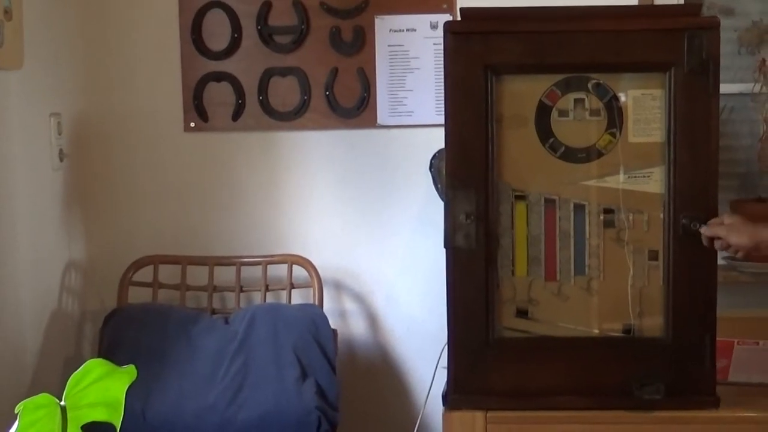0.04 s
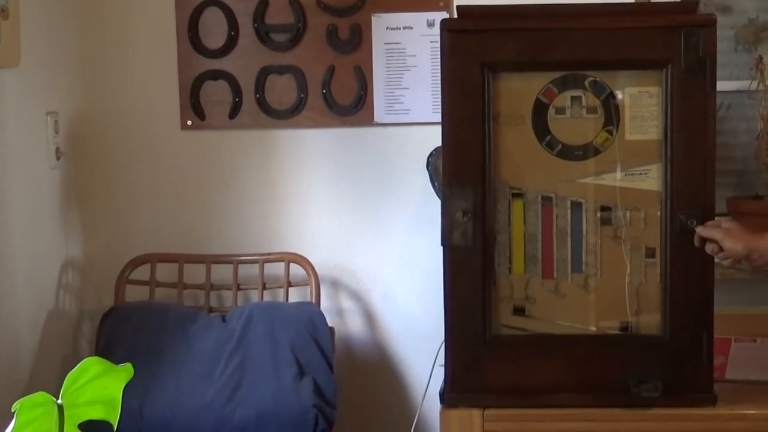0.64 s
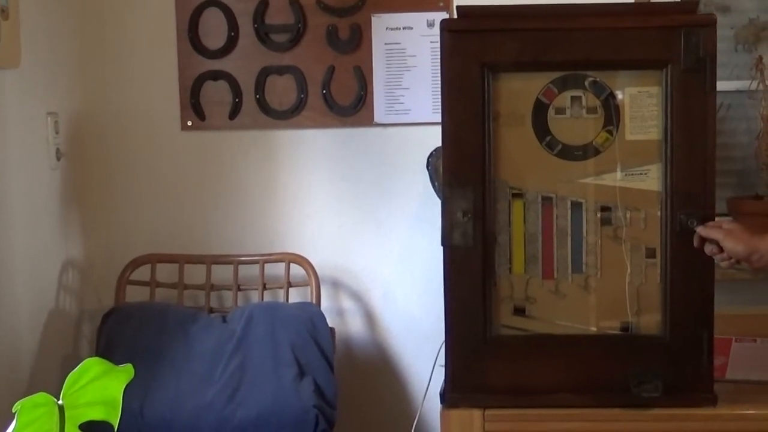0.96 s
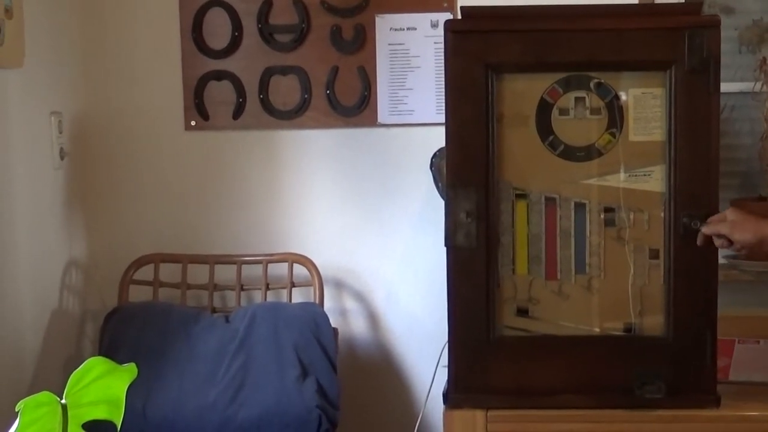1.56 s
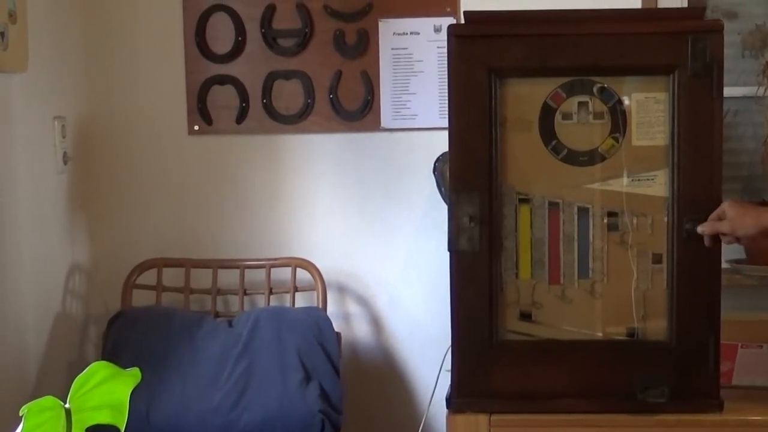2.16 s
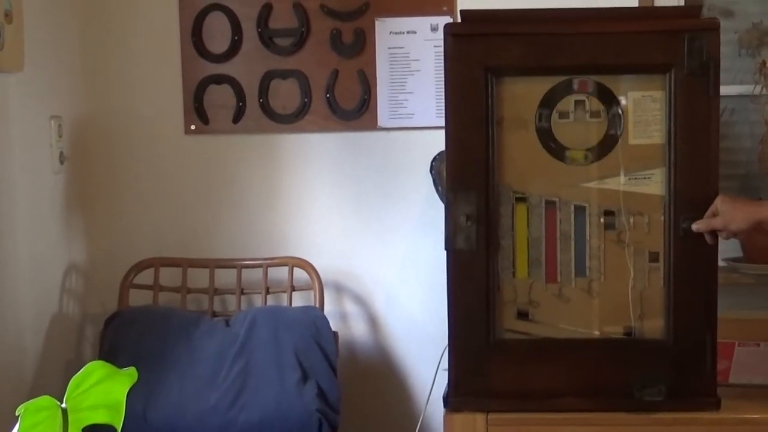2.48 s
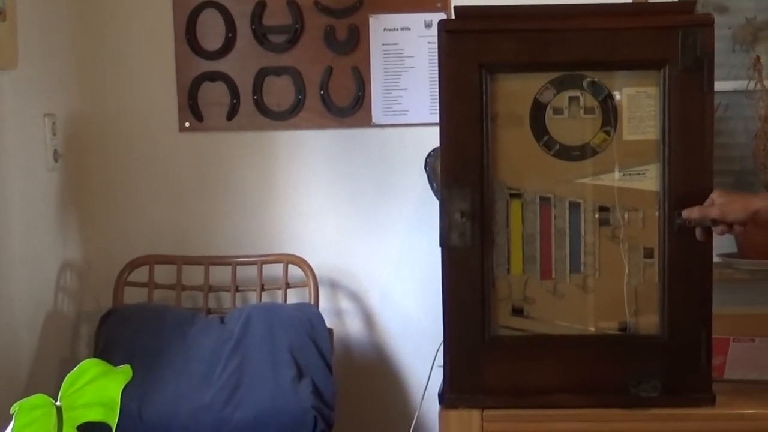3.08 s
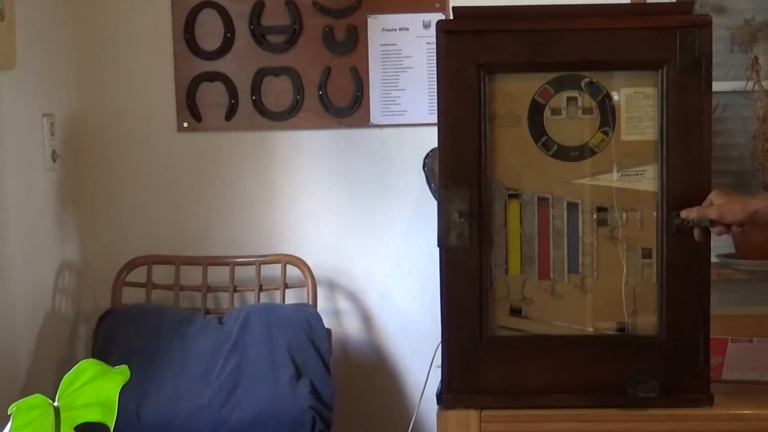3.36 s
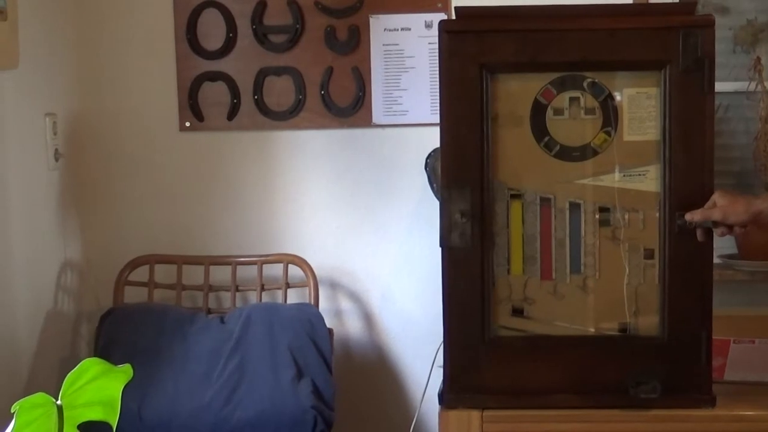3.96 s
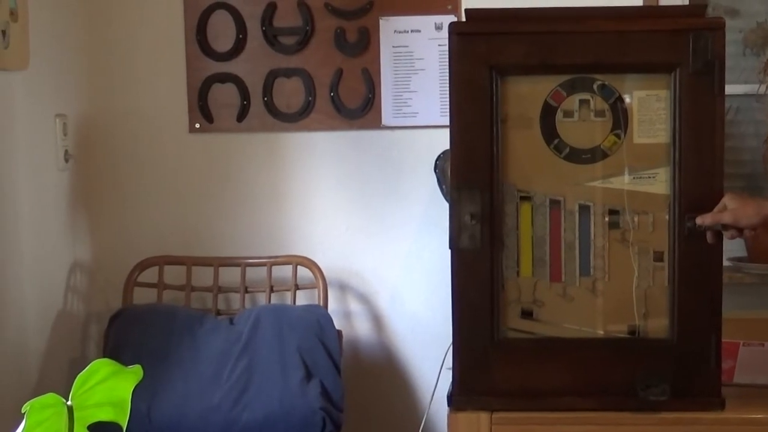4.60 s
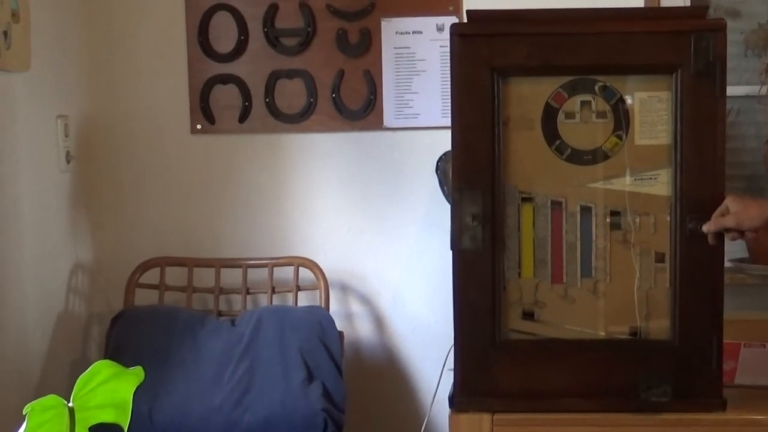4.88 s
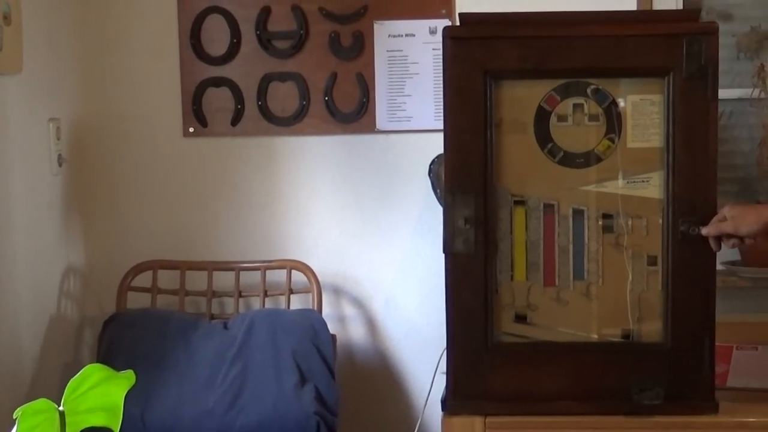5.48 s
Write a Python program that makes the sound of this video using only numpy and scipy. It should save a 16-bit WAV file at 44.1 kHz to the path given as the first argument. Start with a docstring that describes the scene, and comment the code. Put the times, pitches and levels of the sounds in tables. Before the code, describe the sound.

An old mechanical coin machine in a wooden cabinet is worked by hand. A faint ratchet whirs down and stops with a hollow knock. Soft rubbing and handle clicks build into sharp lever clicks and a heavy clunk. Coins release with a clank, clatter down a chute and bounce ringing in a metal cup, followed by faint ticks. The small room adds a short reverberation.

```python
"""The steel works of an old coin machine, worked by hand in a wooden wall cabinet in a small, live room.
Each impact excites the modes of a part and shakes the case: levers click, and the works trip with a clunk.
A ratchet wheel runs down, rods rub in their guides and a spring hums. Coins then clatter down a chute,
and two bounce ringing in the cup. A limiter holds down the loudest blows."""
import sys
import numpy as np
from scipy import signal
from scipy.fft import rfft, irfft, next_fast_len
from scipy.io import wavfile
from scipy.ndimage import uniform_filter1d, minimum_filter1d

SR = 44100
rng = np.random.default_rng(int(sys.argv[2]) if len(sys.argv) > 2 else 0)


def log_audio(samples):
    """Write samples as a 16-bit WAV file to the path given in sys.argv[1]."""
    # one column per channel
    frames = np.atleast_2d(samples).T
    # limit to full scale, then quantise
    limited = np.clip(frames, -1, 1)
    pcm = np.round(limited * 32767).astype(np.int16)
    wavfile.write(sys.argv[1], SR, pcm)


N = 248724
BLOW_SAMPLES = 2 ** 15
BLOW_TIME, SCENE_TIME = np.arange(BLOW_SAMPLES) / SR, np.arange(N) / SR  # seconds

# Spectrum of the wood's thump. Each row: frequency in Hz, relative density in dB.
WOOD_THUMP = [(25, -33), (60, -12.5), (100, -35), (135, 0), (200, -11), (300, -4), (450, -9.5), (900, -39)]
# Stereo width of the room. Each row: frequency in Hz, side relative to mid in dB.
STEREO_WIDTH = [(60, -20), (140, -15), (280, -6), (600, -8), (2000, -9), (5000, -8), (9000, -12),
                (12000, -22)]


def works():
    """Impact excitation: steel parts share one set of modes, and each kind of contact has its own pulse."""
    # Resonances of the steel. Each row: frequency in Hz, bandwidth in Hz, relative gain in dB.
    modes = [(2900, 150, -33), (4000, 220, -22), (5030, 250, -0.5), (5480, 230, -6.5), (6210, 63, 3),
             (7480, 35, -14), (8500, 35, 18), (7970, 320, -17), (10030, 23, 2), (10700, 62, -36),
             (12460, 64, 1), (12800, 61, -29)]
    # Contacts. Each row: start in seconds, then relative steel level, case level and sheen in dB.
    handle_stops = [(1.311, -22, -32.5, -7), (1.330, -52, -45, -6), (1.736, -39, -43, 0),
                    (2.2612, -12, -23.5, -5), (2.2762, -15.5, -25.5, -5)]
    lever_clicks = [(0.6318, -24, -38.5, 9), (2.5163, -13, -29.5, -3), (2.5974, -15.5, -45, 0),
                    (2.6758, -11, -33, 8.5), (2.7208, -18, -34.5, -22), (2.816, -11, -31, 3),
                    (2.8967, -12, -34, 0), (3.190, -14.5, -48, 14.5), (3.752, -12.5, -29, 2),
                    (3.8162, -9, -28, 7), (3.8395, -9, -27, -1), (3.9566, -8.5, -28.5, 1),
                    (4.064, -12, -40, -5), (4.0882, -13, -31, 4), (4.150, -16.5, -40, -22)]
    trip_slams = [(3.0051, -4.5, -14, 3), (3.022, -7, -14, -20), (3.0688, -7.5, -11.5, 4),
                  (3.0968, -14.5, -16.5, -3)]  # the works trip and slam home
    brushing_parts = [(0.778, -47, -39.5, -4), (0.8346, -38, -38.5, 11), (1.262, -42.5, -46, -7),
                      (2.238, -45, -35.5, -3), (2.414, -28, -28.5, -9), (2.8785, -19, -23, 6),
                      (2.9497, -19, -35, 0), (3.219, -21.5, -34, 14), (3.271, -19.5, -36, 5),
                      (3.3492, -22.5, -35.5, 4), (3.985, -28, -37, -8), (4.115, -22, -35.5, -2)]
    pawl_ticks = [(1.548, -47, -45.5, 6), (4.9109, -53, -56, 0), (5.012, -51, -79, 9),
                  (5.0396, -44.5, -72, 15), (5.146, -36, -70, 9), (5.154, -37.5, -72, 5),
                  (5.5648, -51, -74, 15)]  # a light pawl, as the works come to rest
    handle = contacts(handle_stops, modes, WOOD_THUMP, attack=0.0021, t60=0.038, steel_db=-5,
                      ring_db=-13.5, knock_db=7.5, thump_db=-15, bright_hz=9000, bright_db=2.5,
                      wet_db=-4)
    levers = contacts(lever_clicks, modes, WOOD_THUMP, attack=0.0026, t60=0.042, steel_db=-2,
                      ring_db=-15, knock_db=6.5, thump_db=-6, bright_hz=9100, bright_db=2.5, wet_db=1)
    slams = contacts(trip_slams, modes, WOOD_THUMP, attack=0.0043, t60=0.061, steel_db=-2.5,
                     ring_db=-16, knock_db=5, thump_db=3, bright_hz=9200, bright_db=4, wet_db=1)
    scuffs = contacts(brushing_parts, modes, WOOD_THUMP, attack=0.011, t60=0.058, steel_db=1,
                      ring_db=-2, knock_db=7, thump_db=-2, bright_hz=8900, bright_db=-0.5, wet_db=1.5)
    ticks = contacts(pawl_ticks, modes, WOOD_THUMP, attack=0.00099, t60=0.097, steel_db=1.5,
                     ring_db=-25, knock_db=7.5, thump_db=-15, bright_hz=9140, bright_db=9, wet_db=3.5)
    return handle + levers + slams + scuffs + ticks


def cabinet():
    """Free vibration: heavy stops set the low modes of the wooden cabinet ringing."""
    # Each row: start in seconds, level in dB.
    clunks = [(1.328, -32), (3.008, -39), (3.104, -14), (3.126, -16.5), (3.190, -31), (3.850, -29.5)]
    # Each row: frequency in Hz, relative level in dB, t60 in seconds before extra damping.
    modes = [(120, -9, .4), (140, 0, .42), (168, -8, .3), (238, -7, .28), (304, -5, .3), (361, -8, .3),
             (418, -12, .25), (735, -16, .25)]
    return strikes(clunks, modes, scatter_db=3.5, damping=2.2, attack=0.0041, wet_db=-2.5)


def coin_column():
    """Impact excitation: coins tipping out of their column drive its resonances."""
    # Each row: start in seconds, then relative steel level, case level and sheen in dB.
    release = [(3.439, -18.5, -20.5, 8), (3.462, -16, -21, -5), (3.477, -10.5, -25.5, 5.5),
               (3.5112, -5.5, -16.5, 7), (3.5291, -6.5, -48, 3), (3.5525, -16.5, -24.5, -2),
               (3.6204, -24, -36, 10)]
    # Each row: frequency in Hz, bandwidth in Hz, relative gain in dB.
    modes = [(1740, 72, 4), (2500, 43, 4), (3240, 73, 5.5), (4870, 220, 3), (6150, 140, -7),
             (7150, 150, 11), (7900, 44, 8), (7500, 35, -6), (9100, 37, -18), (9130, 26, -16),
             (9640, 43, 2), (10400, 100, -10.5)]
    return contacts(release, modes, WOOD_THUMP, attack=0.0012, t60=0.065, steel_db=-2,
                    ring_db=-8.5, knock_db=-1, thump_db=-73, bright_hz=9130, bright_db=5.5, wet_db=3)


def payout_slide():
    """Heavy damping: the modes of the slide under the column die so fast that it clanks."""
    # Each row: start in seconds, level in dB.
    hits = [(3.464, -10), (3.478, -11), (3.492, -17)]
    # Each row: frequency in Hz, relative level in dB, t60 in seconds before extra damping.
    modes = [(1357, -4, 0.089), (1594, -3, 0.088), (1716, -5, 0.13), (2040, -2, 0.11), (2441, -5, 0.16)]
    return strikes(hits, modes, scatter_db=1, damping=4.4, attack=0.0035, wet_db=-1)


def chute():
    """Plate vibration: tumbling coins ring the chute's sheet wall; single ones knock its mouth and the cup."""
    # Runs of coins. Each row: start and length in seconds, then steel level, case level and loss in dB.
    runs = [(4.226, 0.108, -9.5, -21.5, 5), (4.3994, 0.09, -9, -12.5, 14)]
    # Each row: start in seconds, then relative steel level, case level and sheen in dB.
    knocks = [(4.208, -14, -19.5, -1), (4.5288, -12, -21.5, -8), (4.5945, -24, -26.5, 6),
              (4.6865, -32, -33.5, 1)]
    # Each row: frequency in Hz, bandwidth in Hz, relative gain in dB.
    chute_modes = [(750, 59, 3.5), (1156, 25, 4), (1800, 150, 5.5), (2340, 140, 3), (2815, 48, 2),
                   (3310, 70, -1.5), (4540, 210, -2), (5570, 130, -19), (6050, 140, -0.5), (7200, 45, -13),
                   (8160, 82, 3), (7650, 290, -15), (9000, 240, 1.5), (10200, 120, -12)]
    # Each row: frequency in Hz, relative level in dB, t60 in seconds before extra damping.
    wall_modes = [(2111, -7, .25), (2265, -4, .25), (2920, -7, .2), (3073, -7, .25), (3273, 0, .28)]
    # Each row: frequency in Hz, relative density in dB.
    tray_thump = [(40, -42), (120, -17), (190, -17), (235, -7), (290, 0), (420, -10), (520, -7), (620, -13),
                  (760, -22), (1100, 0), (2000, -41)]
    touches = np.vstack([tumble(*run, count=6) for run in runs])
    clatter = contacts(np.vstack([touches, knocks]), chute_modes, tray_thump, attack=0.00069, t60=0.06,
                       steel_db=-1.5, ring_db=-6, knock_db=-4.5, thump_db=-12.5, bright_hz=8600,
                       bright_db=2, wet_db=1.5)
    wall_hits = touches[:, :2] + [0, -12]  # 12 dB below each touch
    wall = strikes(wall_hits, wall_modes, scatter_db=1.5, damping=1.9, attack=0.00041, wet_db=-2)
    return radiate(clatter, edge_hz=99) + wall


def tumble(start, length, steel_db, case_db, loss_db, count, jitter=0.2, scatter_db=1):
    """Dissipation: the unevenly spaced contacts of a run of coins weaken as it goes on."""
    k = np.arange(count)
    progress = (k + (k > 0) * jitter * rng.standard_normal(count)) / count
    force_db = scatter_db * rng.standard_normal(count) - loss_db * progress
    return np.c_[start + length * progress, steel_db + force_db, case_db + force_db, np.zeros(count)]


def tray():
    """Plate vibration: dropping coins ring the tray, which radiates its lowest modes weakly."""
    # Each row: start in seconds, relative level in dB.
    hits = [(4.412, -22), (4.445, -21.5), (4.54, -29.5), (4.597, -44)]
    # Each row: frequency in Hz, relative level in dB, t60 in seconds before extra damping.
    modes = [(237, 1, .35), (490, -5, .2), (525, -5, .2), (745, -1, .2), (1140, -6, .4)]
    ringing = strikes(hits, modes, scatter_db=3, damping=1.35, attack=0.0026, wet_db=-1)
    return radiate(ringing, edge_hz=356)


def coins(restitution=0.74, bounce_loss_db=9, count=6, wet_db=2):
    """Inelastic collision: two coins bounce ever faster and softer in the cup, ringing and skittering."""
    # Each row: start in seconds, level in dB, first flight in seconds.
    landings = [(4.504, -8, 0.036), (4.528, -12, 0.028)]
    # One set per coin. Each row: frequency in Hz, relative level in dB, t60 in seconds before damping.
    coin_modes = [
        [(7650, -11, .4), (10017, -3, .25), (10588, -1, .28), (10655, -6, .3), (11815, -14, .26),
         (15052, -20, .4)],
        [(8140, -11, .25), (8900, -8, .2), (9215, 0, .26), (9272, -2, .26), (9352, -4, .22), (9880, -4, .18),
         (10436, -4, .18), (12663, -13, .25)],
    ]
    # The skittering rim. Each row: frequency in Hz, bandwidth in Hz, relative gain in dB.
    rim_modes = [(8050, 390, -5.5), (9500, 460, -10), (10040, 550, -8), (11900, 250, -3)]
    track = np.zeros((2, N))
    k = np.arange(count)
    for (start, first_db, first_flight), modes in zip(landings, coin_modes):
        flights = first_flight * restitution ** k
        bounces = np.c_[start + np.cumsum(flights) - flights, first_db - bounce_loss_db * k]
        track += strikes(bounces, modes, scatter_db=1, damping=1.37, attack=0.00026, wet_db=wet_db)
        for s, db in bounces:
            touch = rng.standard_normal(BLOW_SAMPLES) * fade(t60=0.016, attack=0.00044)
            add(track, s, in_room(amp(db + 5.5) * resonate(touch, rim_modes), wet_db))
    return track


def catch():
    """Free vibration: a small catch, flicked, pings in two high modes."""
    # Each row: start in seconds, level in dB.
    flicks = [(1.553, -41.5), (2.598, -19.5), (3.322, -34), (3.441, -19)]
    # Each row: frequency in Hz, relative level in dB, t60 in seconds before extra damping.
    modes = [(5820, -0.44, 0.079), (6080, -1.5, 0.056)]
    return strikes(flicks, modes, scatter_db=0, damping=1.7, attack=0.0012, wet_db=-1)


def latch():
    """Damped resonance: the latch knocks hollowly as the wheel stops."""
    # Each row: start in seconds, level in dB.
    knocks = [(0.640, -47), (0.664, -26.5), (0.705, -51)]
    # Each row: frequency in Hz, relative level in dB, t60 in seconds before extra damping.
    modes = [(270, -18, 0.11), (706, 7, 0.17), (743, 4, 0.11), (787, -20, 0.16), (1190, -8, .1)]
    return strikes(knocks, modes, scatter_db=10, damping=2.3, attack=0.00065, wet_db=-1)


def ratchet(teeth_per_s=64, coast_s=0.85, caught_s=0.77, stop_db_per_s=293, waver_rad=0.32):
    """Repeated excitation: each tooth scrapes and rings a pawl; the slowing wheel sings until caught."""
    # Spectrum of the scrape. Each row: frequency in Hz, relative density in dB.
    whirr_spectrum = [(71, -37), (120, -12.5), (321, -1.5), (557, -13.5), (727, -7), (988, -11),
                      (1790, -11), (3660, -10.5), (3900, -23), (4320, -13), (5750, 4.5), (6240, -4),
                      (8840, -2.5), (14700, -17.5), (16000, -21)]
    # Each row: frequency in Hz, bandwidth in Hz, relative gain in dB.
    pawl_modes = [(4006, 36, -2), (4670, 110, 0.5), (6300, 20, -15), (6620, 170, 4.5), (8090, 23, 5),
                  (8200, 40, -9.5), (8630, 220, -8), (9100, 130, 0.5), (12500, 150, -26)]
    # Each row: frequency in Hz, relative level in dB.
    wheel_tones = [(4016, -63.5), (4576, -59), (5410, -70), (5841, -64), (6611, -63), (8070, -57),
                   (8629, -58), (8829, -52)]
    pace = teeth_per_s * np.exp(-SCENE_TIME / coast_s)
    teeth_passed = np.cumsum(pace) / SR
    since_tooth = (teeth_passed % 1) / pace
    tooth_force = amp(0.29 * rng.standard_normal(1000))[teeth_passed.astype(int)]
    turning = amp(-stop_db_per_s * np.maximum(SCENE_TIME - caught_s, 0))
    pressure = turning * tooth_force * (np.exp(-since_tooth / 0.0067) + 0.39)
    scrape = unit(pressure) * np.sqrt(np.mean(turning ** 2)) * rng.standard_normal(N)
    whirr = unit(filtered(scrape, lambda hz: amp(along(whirr_spectrum, hz)))) * scrape.std()
    ticking = amp(-2) * whirr + amp(-3.5) * resonate(scrape, pawl_modes)
    tones = sum(amp(db) * np.sin(2 * np.pi * hz * SCENE_TIME + waver_rad * noise(lambda f: -f, N))
                for hz, db in wheel_tones)
    return amp(-39) * (in_room(ticking, wet_db=-2.5) + amp(-10.5) * turning * unit(tones))


def rods(slips_per_s=350, grip_db_per_s=334):
    """Stick-slip friction: rods rub through their guides in tiny slips that sound through the wood."""
    # Each row: time of the peak in seconds, relative level in dB, t60 in seconds.
    strokes = [(0.69, -37, 0.083), (0.785, -43, 0.7), (1.278, -50, 0.067), (1.345, -37.5, 0.35),
               (1.56, -54, 0.19), (1.605, -54, 0.15), (1.698, -50.5, 0.058), (1.765, -45.5, 0.54),
               (2.277, -38.5, 0.58), (2.43, -43.5, 0.42), (2.56, -65, 0.68), (5.245, -52, 0.34)]
    # Each row: frequency in Hz, relative density in dB.
    rub_spectrum = [(53, -13), (90, -8), (120, -17), (249, 2), (326, -7), (426, -4.5), (559, -7),
                    (709, 0.5), (818, -6), (1430, -16), (1750, -9), (3750, -84), (4000, -41), (5200, -62),
                    (8800, -120)]
    slips = (rng.random(N) < slips_per_s / SR) * rng.exponential(size=N)
    friction = unit(slips) + 0.5 * rng.standard_normal(N)
    rub = unit(filtered(friction, lambda hz: amp(along(rub_spectrum, hz))))
    effort = sum(amp(db - np.maximum(grip_db_per_s * (s - SCENE_TIME), 60 * (SCENE_TIME - s) / t60))
                 for s, db, t60 in strokes)
    return in_room(amp(-1.5) * rub * effort, wet_db=-4.5)


def spring(hum_hz, rough_db):
    """Amplitude and phase modulation: the main spring hums unevenly, swelling each time it moves."""
    # Each row: time of the peak in seconds, relative level in dB, half-length in seconds.
    swells = [(0.61, -48, 0.03), (0.79, -40, 0.084), (2.613, -45.5, 0.06), (2.792, -32.5, 0.1)]
    waver = noise(lambda hz: -hz, N)
    flutter = noise(lambda hz: -hz / 2, N)
    swing = sum(amp(db) * np.exp(-((SCENE_TIME - s) / half) ** 2) for s, db, half in swells)
    hum = np.sqrt(2) * np.sin(2 * np.pi * hum_hz * SCENE_TIME + 0.16 * waver)
    return amp(-4.5) * hum * swing * amp(rough_db * flutter)


def squeak():
    """Noise modulation spreads a falling tone into a faint, airy squeak as the works come to rest."""
    # Each row: time in seconds, frequency in Hz, level in dB.
    glide = [(5.22, 5150, -78), (5.28, 4850, -61), (5.34, 4550, -61), (5.41, 4100, -63), (5.46, 3800, -78)]
    s, hz, db = np.transpose(glide)
    blur = noise(lambda f: -60 * (f / 700) ** 2, N)
    tone = np.sin(2 * np.pi * np.cumsum(np.interp(SCENE_TIME, s, hz)) / SR)
    envelope = amp(np.interp(SCENE_TIME, s, db)) * (SCENE_TIME >= s[0]) * (SCENE_TIME <= s[-1])
    return in_room(blur * tone * envelope, wet_db=5)


def hush(floor_db):
    """Stationary noise: the quiet room and a faint hiss."""
    # Each row: frequency in Hz, relative density in dB.
    spectrum = [(25, -12), (60, -4), (125, -1), (300, 0), (1000, -8), (2300, -11), (3400, -7), (4200, -13),
                (6500, -13), (9500, -11), (11500, -17), (16000, -24)]
    mid, side = (noise(lambda hz: along(spectrum, hz), N) for _ in range(2))
    side = filtered(side, lambda hz: amp(along(STEREO_WIDTH, hz)))
    return amp(floor_db) * np.array([mid + side, mid - side])


def contacts(rows, modes, thump_spectrum, attack, t60, steel_db, ring_db, knock_db, thump_db,
             bright_hz, bright_db, wet_db):
    """Structure-borne sound: each steel contact chatters and rings its part; the case knocks and thumps."""
    # Each row: frequency in Hz, relative density in dB.
    steel_spectrum = [(900, -14.5), (2000, -2), (3200, 0), (5000, -2), (7000, 1), (9300, 3.5), (10500, -3),
                      (12000, -8.5), (15500, -22)]
    case_spectrum = [(50, -42), (150, -61), (250, -1.5), (500, -2.5), (750, 4.5), (1300, 3.5), (2000, 1.5),
                     (3000, -4.5), (5000, -34)]

    def chatter_db(hz, sheen_db):
        """Each kind of part has its brightest band, each contact its own sheen at the very top."""
        band = np.exp(-(np.log((hz + 1) / bright_hz) / 0.16) ** 2)
        top = along([(9000, 0), (12500, 1)], hz)
        return along(steel_spectrum, hz) + bright_db * band + sheen_db * top

    track = np.zeros((2, N))
    pulse = fade(t60, attack)
    for s, db, case_db, sheen_db in rows:
        chatter = noise(lambda hz: chatter_db(hz, sheen_db), BLOW_SAMPLES) * pulse
        ringing = resonate(rng.standard_normal(BLOW_SAMPLES) * pulse, modes)
        knock = noise(lambda hz: along(case_spectrum, hz), BLOW_SAMPLES) * fade(0.078, attack + 0.005)
        thump = noise(lambda hz: along(thump_spectrum, hz), BLOW_SAMPLES) * fade(0.11, attack + 0.012)
        steel = amp(steel_db) * chatter + amp(ring_db) * ringing
        case = amp(knock_db) * knock + amp(thump_db) * thump
        add(track, s, in_room(amp(db) * steel + amp(case_db) * case, wet_db))
    return track


def strikes(rows, modes, scatter_db, damping, attack, wet_db):
    """Superposition: each blow rings the same body afresh, and the responses add."""
    track = np.zeros((2, N))
    onset = 1 - np.exp(-BLOW_TIME / attack)
    for s, db in rows:
        add(track, s, in_room(amp(db) * ring(modes, scatter_db, damping) * onset, wet_db))
    return track


def ring(modes, scatter_db, damping):
    """Modal decay: a sum of sinusoids of scattered strength, each t60 divided by the damping."""
    hz, db, t60 = np.transpose(modes)
    gain = amp(db + scatter_db * rng.standard_normal(len(hz)))
    phase = rng.uniform(0, 2 * np.pi, (len(hz), 1))
    t = BLOW_TIME[:BLOW_SAMPLES // 2]
    waves = np.sin(2 * np.pi * hz[:, None] * t + phase) * amp(-60 * t * damping / t60[:, None])
    return np.pad(gain @ waves / np.sqrt(np.sum(gain ** 2) / 2), (0, BLOW_SAMPLES // 2))


def resonate(x, modes):
    """Forced response: x drives parallel resonances of alternating sign and keeps its energy."""
    y = filtered(x, lambda f: sum((-1) ** k * amp(db) * 1j * f * width / (hz**2 - f**2 + 1j * f * width)
                                  for k, (hz, width, db) in enumerate(modes)))
    return y * np.linalg.norm(x) / (np.linalg.norm(y) + 1e-20)


def radiate(x, edge_hz):
    """Radiation efficiency: small sheet-metal parts give off no deep bass."""
    return signal.sosfilt(signal.butter(2, edge_hz, "highpass", fs=SR, output="sos"), x)


def in_room(x, wet_db):
    """Reverberation: the direct sound is followed by a diffuse stereo tail whose treble dies first."""
    # Each row: frequency in Hz, t60 in seconds.
    decay_times = [(100, 0.62), (260, 0.34), (700, 0.44), (1800, 0.38), (5000, 0.4), (9000, 0.32),
                   (14000, 0.22)]
    hz = np.fft.rfftfreq(256, 1 / SR)[:, None]
    t = np.arange(200) * 128 / SR
    spectra = rng.standard_normal((2, len(hz), 2 * len(t))).view(complex)
    spectra *= amp(-60 * t / along(decay_times, hz))
    spectra[1] *= amp(along(STEREO_WIDTH, hz))
    mid, side = signal.istft(spectra, nperseg=256)[1]
    tail = np.array([mid + side, mid - side]) * amp(wet_db) / np.linalg.norm(mid)
    response = np.pad(tail, ((0, 0), (SR // 300, 0)))  # delay of the first reflection
    response[:, 0] = 1  # direct path
    return signal.fftconvolve(x[None], response, axes=1)[:, :len(x)] / np.sqrt(1 + amp(wet_db) ** 2)


def fade(t60, attack):
    """Envelope of a blow: quick rise and exponential decay, both given in seconds."""
    return amp(-60 * BLOW_TIME / t60) * (1 - np.exp(-BLOW_TIME / attack))


def noise(gain_db, size):
    """Noise of rms 1 coloured by a dB function of frequency."""
    return unit(filtered(rng.standard_normal(size), lambda hz: amp(gain_db(hz))))


def filtered(x, response):
    """Linear filtering: the spectrum of x times a function of frequency."""
    n = x.shape[-1]
    padded = next_fast_len(n + 4096, True)
    return irfft(rfft(x, padded) * response(np.fft.rfftfreq(padded, 1 / SR)), padded)[..., :n]


def along(points, hz):
    """Interpolate (Hz, value) points on a logarithmic frequency axis."""
    frequencies, values = np.transpose(points)
    return np.interp(np.log(hz + 1), np.log(frequencies + 1), values)


def add(track, start, sound):
    """Mix a sound into the track at a start in seconds."""
    part = track[:, round(start * SR):][:, :sound.shape[-1]]
    part += sound[:, :part.shape[1]]


def amp(db):
    """Decibels to gain."""
    return 10 ** (np.asarray(db) / 20)


def unit(x):
    """Scale to rms 1."""
    return x / np.sqrt(np.mean(x ** 2) + 1e-20)


def scene():
    """Superposition: the machine, its coins and the quiet room add in stereo."""
    struck_bodies = cabinet() + latch() + catch() + tray() + payout_slide()
    clatter = works() + coin_column() + chute() + coins()
    running = ratchet() + rods() + spring(hum_hz=91, rough_db=4) + squeak()
    return struck_bodies + clatter + running + hush(floor_db=-58.5)


def record(dry, ceiling_db=-6, hold_s=0.041, top_hz=15800):
    """Peak limiting: the gain dips briefly at loud blows; nothing above the band limit passes."""
    needed_gain = np.minimum(1, amp(ceiling_db) / (np.abs(dry).max(axis=0) + 1e-9))
    hold = 2 * int(hold_s * SR / 2) + 1
    held_gain = minimum_filter1d(needed_gain, hold, origin=hold // 2 - SR // 1000)  # looks 1 ms ahead
    return filtered(dry * uniform_filter1d(held_gain, size=88), lambda hz: hz < top_hz)


dry = scene()
out = record(dry)
log_audio(out)
```